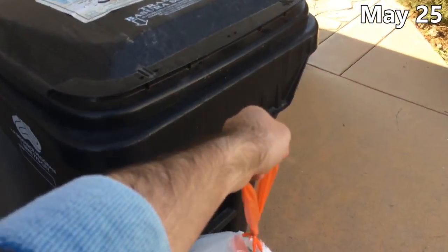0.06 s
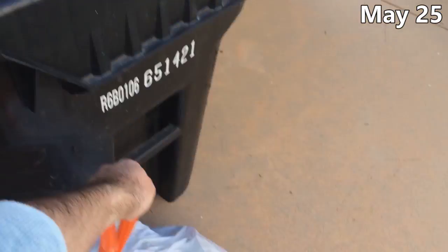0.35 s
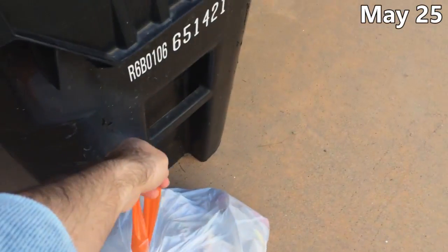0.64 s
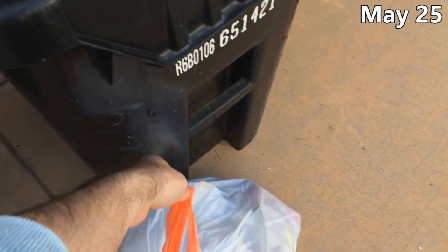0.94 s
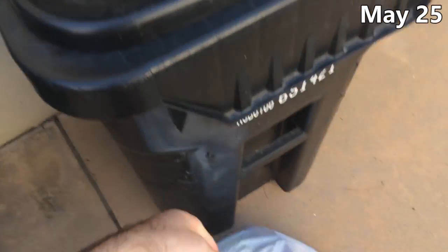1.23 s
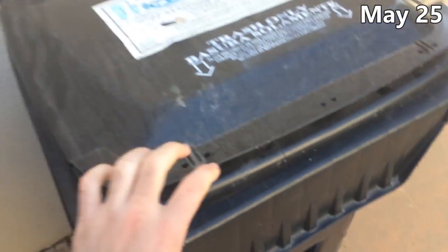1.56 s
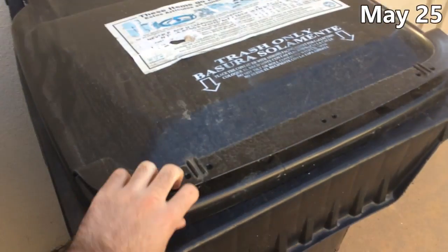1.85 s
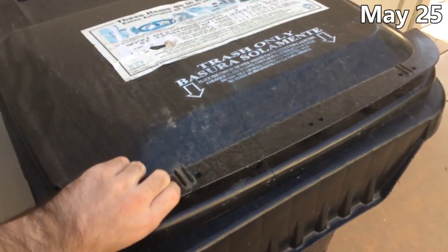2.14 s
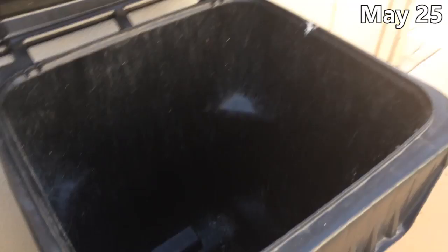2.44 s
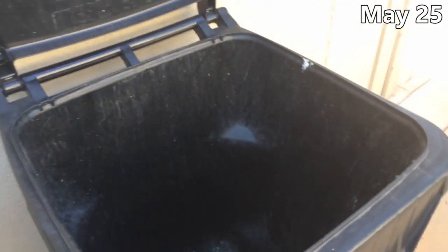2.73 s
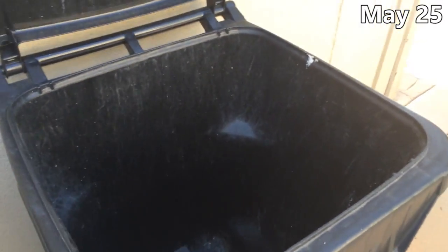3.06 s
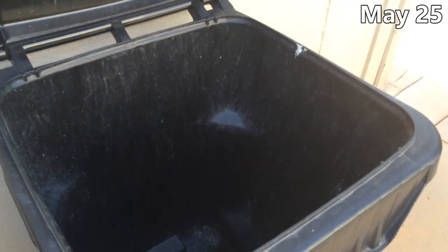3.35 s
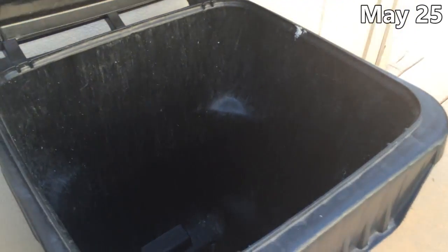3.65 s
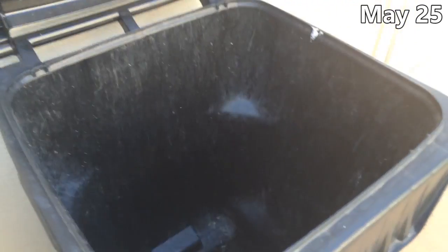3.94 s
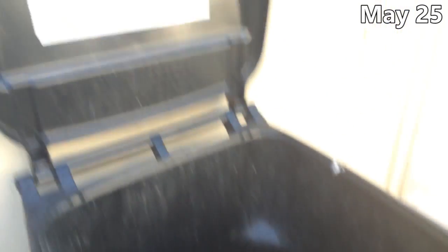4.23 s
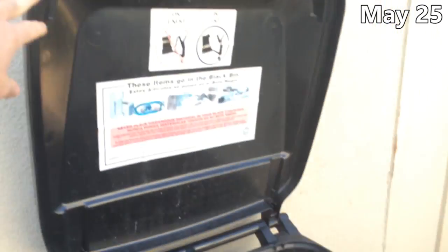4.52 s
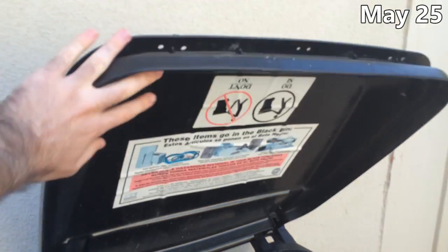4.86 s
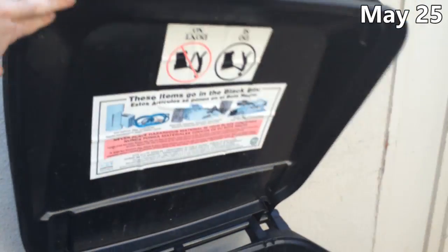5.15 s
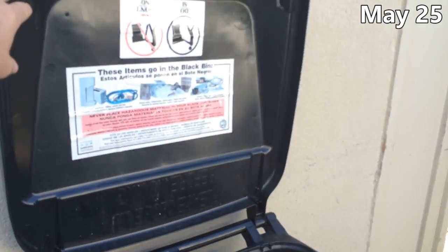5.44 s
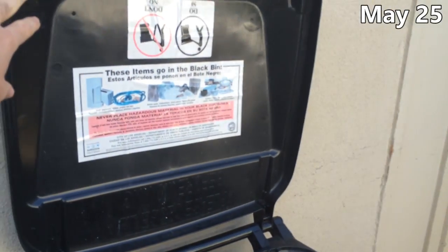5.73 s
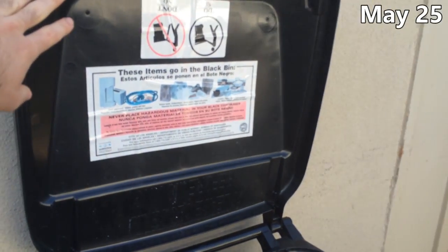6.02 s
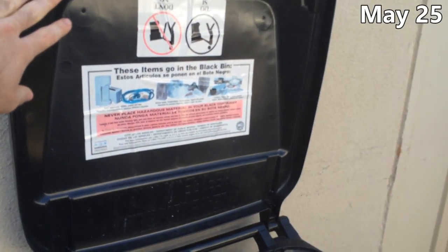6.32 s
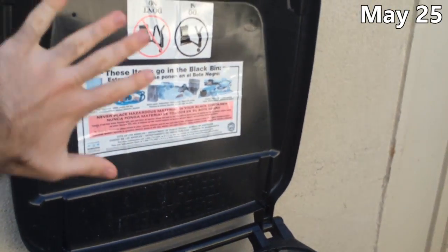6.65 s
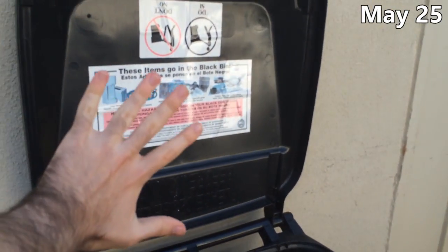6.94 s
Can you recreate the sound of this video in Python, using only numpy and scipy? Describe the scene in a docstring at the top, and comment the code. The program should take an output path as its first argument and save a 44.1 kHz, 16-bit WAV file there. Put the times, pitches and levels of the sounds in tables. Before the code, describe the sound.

A plastic trash bag crinkles, lands on concrete with a soft thud and swishes off a hand. The lid of an empty wheelie bin is then lifted, clattering on its loose hinge as the bin booms hollowly. More bursts of knocks follow as it swings back against a wall, ending with a soft bump. The sounds are close, outdoors, over a distant idling engine and low rumble.

```python
"""A rubbish bag crinkles, thuds down on concrete and slides off the hand. Then the lid of a plastic
wheelie bin is lifted, swung back on its loose hinge and knocked against a wall: each contact rings the
plastic, and the empty bin booms under it. An engine throbs at idle some way off, in the rush and rumble
of a yard. An automatic gain control ducks the loudest blows and lets the background swell back."""
import sys
import numpy as np
from scipy import signal
from scipy.fft import rfft, irfft, next_fast_len
from scipy.io import wavfile
from scipy.ndimage import uniform_filter1d, minimum_filter1d, map_coordinates

SR = 44100
rng = np.random.default_rng(int(sys.argv[2]) if len(sys.argv) > 2 else 0)


def bounce(signal):
    """Save signal as a 16-bit WAV file at the path given by the first command-line argument."""
    frames = np.transpose(np.atleast_2d(signal))
    limited = np.clip(frames, -1, 1)
    pcm = np.round(limited * 32767).astype(np.int16)
    wavfile.write(sys.argv[1], SR, pcm)


N = 312228


def amp(db):
    return 10 ** (np.asarray(db) / 20)


def unit(x):
    return x / np.sqrt(np.mean(x ** 2) + 1e-20)


def along(points, hz):
    """Read (Hz, value) points along a log frequency axis."""
    f, v = np.transpose(points)
    return np.interp(np.log(hz + 1), np.log(f + 1), v)


def curve(rows):
    """One value per sample from (seconds, value) rows."""
    return np.interp(np.arange(N) / SR, *np.transpose(rows))


def wobble(rate):
    """A smooth random curve, rate knots a second."""
    return map_coordinates(rng.standard_normal(1024), [np.arange(N) * rate / SR], mode="wrap")


def filtered(x, response):
    """Filter x by a gain given as a function of Hz."""
    m = next_fast_len(len(x) + SR // 8)
    return irfft(rfft(x, m) * response(np.fft.rfftfreq(m, 1 / SR)), m)[:len(x)]


def coloured(x, spectrum):
    """x shaped by (Hz, dB) points, at rms 1."""
    return unit(filtered(x, lambda hz: amp(along(spectrum, hz))))


def band_noise(samples, pitch_hz, q):
    """Noise around a pitch, at rms 1; a higher q narrows it."""
    band = lambda hz: 1 / np.hypot(1, q * (hz / pitch_hz - pitch_hz / (hz + 1)))
    return unit(filtered(rng.standard_normal(samples), band))


def grains(rate, spread_db):
    """Random tiny impulses, rate a second; a positive spread makes a few stand out."""
    chance, size = rng.random(N), rng.standard_normal(N)
    return unit((chance < rate / SR) * size * amp(spread_db * np.minimum(rng.exponential(size=N), 4)))


def add(track, s, sound):
    """Mix a sound into the track at s seconds."""
    part = track[round(s * SR):][:len(sound)]
    part += sound[:len(part)]


def yard():
    """Distant outdoor rush, a thin whir that comes and goes, low rumble and a drone that soon stops."""
    # Level curves. Each row: time in seconds, level in dB.
    air_levels = [(0, -43), (.6, -45.5), (1.1, -43), (1.5, -41.5), (1.9, -51), (2.8, -47.5), (4, -51.5),
                  (5.3, -50), (6, -52.5)]
    whir_levels = [(0, -63), (.6, -54.5), (1.1, -55), (2, -66.5), (3.3, -57), (4.2, -64), (7, -72)]
    rumble_levels = [(0, -46.5), (1.2, -58), (2, -48), (3.2, -46), (4.7, -45.5), (5.4, -51), (6.1, -69),
                     (6.7, -53), (7, -43.5)]
    drone_levels = [(0, -34), (.17, -44.5), (.4, -41), (.54, -33), (.61, -37), (.66, -55), (.9, -90)]
    # Noise colours. Each row: frequency in Hz, relative level in dB.
    air_colour = [(150, -7), (250, 0), (440, -1), (600, -4.5), (900, -7.5), (1330, -7.5), (1700, -10),
                  (2700, -14.5), (4000, -20), (6000, -24.5), (9000, -33), (15500, -41)]
    whir_colour = [(1100, -33), (1500, -0.5), (1700, 3.5), (1950, 0), (2300, -9.5), (3200, -47)]
    rumble_colour = [(20, -22), (40, -14), (55, 27), (80, 23), (120, 16.5), (250, 2), (500, -62.5)]
    air_swell = amp(curve(air_levels) - 1.87 + .6 * wobble(4.845))
    air = air_swell * coloured(rng.standard_normal(N), air_colour)
    whir = amp(curve(whir_levels)) * coloured(rng.standard_normal(N), whir_colour)
    gusts = amp(1.5 * wobble(6))
    rumble = amp(curve(rumble_levels)) * gusts * coloured(rng.standard_normal(N), rumble_colour)
    drone_hz = curve([(0, 92.7), (.55, 96.1)]) * (1 + 0.032 * wobble(11.3))
    drone = amp(curve(drone_levels)) * unit(np.sin(2 * np.pi * np.cumsum(drone_hz) / SR))
    return air + whir + rumble + drone


def engine():
    """An idling engine: each firing gives one exhaust throb and shakes the casing."""
    # Exhaust harmonics. Each row: multiple of the firing rate, relative level in dB.
    orders = [(1, -22), (2, -11), (3, -6), (4, -3.5), (5, -2), (6, -14), (7, -8), (8, -0.5), (9, -10),
              (10, -21), (11, -28), (12, -19.5), (13, -36), (14, -12), (15, -17), (16, -68)]
    # Narrow casing resonances. Each row: centre in Hz, width in Hz, relative level in dB.
    casing_modes = [(363, 7.2, -3), (450, 24, -8), (621, 4.1, 6.5), (929, 19, -3.5)]
    firing_hz = 25.5 * (1 + .012 * wobble(5))
    phase = 2 * np.pi * np.cumsum(firing_hz) / SR
    # the pipe delays higher orders, spreading each throb; each order wavers on its way through the yard
    exhaust = sum(amp(db + 1.5 * wobble(6)) * np.cos(round(k) * phase - .31 * k * k + .25 * wobble(8))
                  for k, db in orders)
    shaking = rng.standard_normal(N) * (1 + 0.31 * np.cos(phase))
    casing = filtered(shaking, lambda f: sum(amp(db) * 1j * f * width / (hz * hz - f * f + 1j * f * width)
                                             for hz, width, db in casing_modes))
    return amp(-45.5 + 1.53 * wobble(12)) * unit(exhaust) + amp(-58) * unit(casing)


def hand_strokes():
    """Skin hisses faintly as it slides over the lid."""
    # Each row: middle in seconds, level in dB, half length in seconds.
    strokes = [(2.43, -57.5, 0.15), (3.975, -55, 0.022), (4.92, -61.5, 0.046), (5.177, -56.5, 0.057)]
    # Colour of skin on plastic. Each row: frequency in Hz, relative level in dB.
    skin_colour = [(3000, 0), (6000, 1), (10000, -4), (15000, -0.5)]
    t = np.arange(N) / SR
    sliding = sum(amp(db) * np.exp(-.5 * ((t - s) / half_length) ** 2) for s, db, half_length in strokes)
    return sliding * coloured(grains(rate=9500, spread_db=-2), skin_colour)


def scuffs():
    """Sleeve and bag brush in short, dull swells."""
    # Each row: middle in seconds, level in dB, half length in seconds, pitch in Hz.
    rubs = [(0.231, -44, 0.011, 596), (0.978, -44, 0.01, 750), (1.057, -46.5, 0.0092, 670),
            (1.411, -43.5, .014, 900), (1.477, -39, 0.011, 1010), (1.607, -49, 0.03, 950)]
    out, t = np.zeros(N), np.arange(-SR // 8, SR // 8) / SR
    for s, db, half_length, pitch_hz in rubs:
        swell = amp(db) * np.exp(-.5 * (t / half_length) ** 2)
        add(out, s + t[0], swell * band_noise(len(t), pitch_hz, q=3))
    return out


def clicks(rows, level_db, t60, tail_db, tail_t60):
    """Tiny broad snaps, each with a longer answer from the yard."""
    out, t = np.zeros(N), np.arange(SR // 8) / SR
    for s, db, pitch_hz in rows:
        decay = amp(-60 * t / t60) + amp(tail_db - 60 * t / tail_t60)
        add(out, s, amp(db + level_db) * decay * band_noise(len(t), pitch_hz, q=.9))
    return out


def blows(rows, modes, ring_db, damping, tail_db, direct_s, snap_db, spot_db):
    """Each contact rings the bin's modes and a dense, noisy shell response in its own colour."""
    # Dense ringing of plastic and yard. Each row: frequency in Hz, gain in dB.
    shell_colour = [(25, 0), (50, 11), (85, 23), (135, 14.5), (200, 15), (380, 12.5), (550, 10.5),
                    (1050, 8.5), (1500, 11.5), (2500, 10), (3600, 6), (5000, 2), (7500, 4), (15000, -12)]
    # How long it rings. Each row: frequency in Hz, seconds to fade by 60 dB.
    shell_t60 = [(80, 0.64), (300, 0.42), (1000, 0.19), (2500, 0.12), (5000, 0.13), (14000, 0.12)]
    out, t = np.zeros(N), np.arange(SR // 2) / SR
    mode_hz, mode_db, mode_t60 = np.transpose(modes)[:, :, None]
    is_panel = mode_hz > 450
    # each mode needs about a cycle to build up
    ringing = amp(mode_db + ring_db - 60 * damping * t / mode_t60) * (1 - np.exp(-t * mode_hz))
    # the struck panel sounds first, then the cavity rings on more quietly
    envelope = amp(tail_db) + (1 - amp(tail_db)) * np.exp(-t / direct_s)
    for s, boom_db, hollow_db, clack_db, crack_db, rise, spot_hz in rows:
        contact = [(85, boom_db), (190, hollow_db), (380, hollow_db), (800, clack_db), (5000, crack_db)]
        # the struck spot lifts or dips its own band
        spot = lambda f: spot_db * np.exp(-(np.log((f + 1) / spot_hz) / 0.16) ** 2)
        colour_db = lambda f: along(contact, f) + spot(f)
        # panel modes take another strength, sign and tension at each contact
        strength, side, tension = rng.standard_normal((3, len(modes), 1))
        scatter = np.where(is_panel, np.sign(side) * amp(3.5 * strength - 2.5), amp(strength))
        drive = amp(colour_db(mode_hz)) * scatter
        tuned_hz = mode_hz * (1 + .01 * tension * (mode_hz > 200))
        ring = (drive * ringing * np.sin(2 * np.pi * tuned_hz * t)).sum(axis=0)
        hz, frame_s, noise = signal.stft(rng.standard_normal(len(t)), SR, nperseg=512)
        band_decay = amp(-60 * frame_s / along(shell_t60, hz)[:, None])
        fading = signal.istft(noise * band_decay, SR, nperseg=512)[1][:len(t)]
        shell = filtered(fading, lambda f: amp(along(shell_colour, f) + colour_db(f)))
        bass = filtered(shell, lambda f: 1 / (1 + (f / 400) ** 4))
        treble_snap = (shell - bass) * (1 + amp(snap_db - 60 * t / 0.0047))
        bass_swell = bass * (1 - np.exp(-t / 0.0036))
        attack = 1 - np.exp(-t / max(rise, 1e-4))
        add(out, s, (treble_snap + bass_swell + ring) * envelope * attack)
    return out


def bag_film():
    """The bag's thin film crinkles as it flexes and swishes as it slides off the hand."""
    # Film and drawstring slides. Each row: start in seconds, level in dB, rise and t60 in seconds.
    slides = [(0.361, -23, 0.0089, 0.29), (1.216, -25, 0.016, 0.13), (1.275, -40.5, .008, 0.17),
              (1.328, -24, 0.0031, 0.13), (1.456, -42.5, 0.013, 0.35)]
    # How hard the film is flexed until let go. Each row: time in seconds, level in dB.
    flex_levels = [(0, -61), (.12, -53.5), (.28, -56), (.45, -42), (.7, -65.5), (1, -58), (1.2, -51),
                   (1.45, -51.5), (1.8, -74)]
    # Colours of crinkle and swish. Each row: frequency in Hz, relative level in dB.
    film_colour = [(1470, -22), (2500, -16), (3030, 2), (3270, -4.5), (6540, -1), (14000, -7.5),
                   (15500, -12.5)]
    swish_colour = [(500, -47), (1000, 9.5), (1300, 11), (1800, 8.5), (2700, 7), (4000, 4), (6500, 1),
                    (10000, -57), (15000, -57)]
    # Sharp crackles. Each row: start in seconds, relative level in dB, pitch in Hz.
    snaps = [(0.0795, -19, 7140), (0.1795, -24.5, 4280), (0.613, -24, 9870), (0.711, -21, 7600),
             (1.0418, -28, 6440), (1.281, -22, 4440), (1.6253, -26, 6010), (1.6527, -25, 4900),
             (1.749, -32, 4580), (1.891, -28.5, 3900)]
    t, slide = np.arange(SR // 2) / SR, np.zeros(N)
    for s, db, rise, t60 in slides:
        add(slide, s, amp(db - 60 * t / t60) * (1 - np.exp(-t / rise)))
    since_let_go = np.maximum(np.arange(N) / SR - flex_levels[-1][0], 0)
    flexing = amp(curve(flex_levels) - 58 * since_let_go + 0.9 * wobble(38.75))  # settles 58 dB a second
    crumpling = flexing + amp(-7.5) * slide  # each slide also crumples the film
    crinkle = crumpling * coloured(grains(rate=2600, spread_db=1.2), film_colour)
    crease_pops = amp(-4.5) * flexing * coloured(grains(rate=27, spread_db=5.0), film_colour)
    swish = slide * coloured(grains(rate=8000, spread_db=-1.5), swish_colour)
    crackles = clicks(snaps, level_db=-13.5, t60=0.013, tail_db=-19.5, tail_t60=0.19)
    return crinkle + crease_pops + swish + crackles


def bag_landing():
    """The bag lands on concrete beside the bin in quick thuds with a low, hollow ring."""
    # Each row: start in seconds, boom, hollow, clack and crack in dB, rise in seconds, struck spot in Hz.
    thuds = [(0.346, -36, -18, -16.5, -30.5, 0.0032, 1870), (0.37, -45, -12, -21, -49.5, 0.0054, 1680.0),
             (0.402, -19, -21.5, -25, -33, 0.003, 2100.0), (0.465, -21, -30, -26.5, -31.5, 0.01, 1530.0)]
    # Low resonances of the bin as the bag touches it.
    # Each row: pitch in Hz, relative level in dB, t60 in seconds before damping.
    low_bin_modes = [(138, -8, 0.32), (193.8, -9.5, 1), (314, -30, 0.18)]
    return blows(thuds, low_bin_modes, ring_db=2.0, damping=0.35, tail_db=-15.5, direct_s=0.03,
                 snap_db=-17, spot_db=-2)


def rebounds(knocks):
    """The loose lid chatters: each knock becomes a first contact and its ever softer rebounds."""
    gap_s, loss_db, softening = .0135, 0.9, 0.073  # per rebound
    soft_rise_s, hard_rise_s = 0.0064, 0.00066  # a harder contact is shorter
    soft_crack_db, hard_crack_db = -37, -8.5  # and so brighter
    rows = []
    for s, db, hardness, hollow_db, boom_db, count, spot_hz in knocks:
        gaps = gap_s * np.exp(.15 * rng.standard_normal(size=6))
        for gap in gaps[:round(count) + 1]:
            hardness = np.clip(hardness, 0, 1)
            rise = soft_rise_s * (hard_rise_s / soft_rise_s) ** hardness
            crack_db = soft_crack_db + (hard_crack_db - soft_crack_db) * hardness
            rows.append((s, db + boom_db, db + hollow_db, db, db + crack_db, rise, spot_hz))
            s, db, hardness = s + gap, db - loss_db, hardness - softening
    return rows


def bin_lid():
    """The lid knocks on rim, hinge and wall, and the empty bin booms under it."""
    # Each row: start in seconds, strength in dB, hardness from 0 to 1, hollow and boom in dB over
    # the strength, number of rebounds, resonance of the struck spot in Hz.
    knocks = [(2.111, -41.5, 0.54, -2, 11, 0, 1330), (2.359, -27.5, 0.35, 0, 6, 1, 970),
              (2.412, -38, 0.5, 8, 22.5, 0, 880), (2.472, -20, 0.37, -1.5, -14, 0, 1260),
              (2.497, -17.5, 0.32, -1.5, -1, 0, 1360), (2.548, -20.5, 0, -0.5, 1, 0, 520),
              (2.609, -19, 0.66, 4.5, 4, 1, 1690), (2.651, -12.5, 0.95, -2, -5, 2, 1080),
              (2.69, -12.5, 0.96, -1, -16, 2, 1230), (2.729, -7, 0.9, -1, 1.5, 2, 900),
              (2.772, -11, 0.73, -1.5, -4, 0, 1840), (2.793, -13.5, 0.89, 2, 5.5, 0, 1920),
              (2.864, -19.5, 0.55, -1, -8, 0, 1290), (3.531, -34, .2, 15, 2, 0, 820),
              (3.544, -16.5, 0.2, -10.5, -17, 0, 2010), (3.569, -10, .68, -7, -15, 1, 780),
              (3.68, -30, 0, 0, 5, 0, 540), (3.724, -30, 0.81, -3.5, -20, 0, 905),
              (3.799, -21, .62, -4.5, -24, 0, 950), (3.932, -39, 0.6, 11.5, -5, 0, 920),
              (3.953, -21, 0.12, -8, 0, 0, 980), (4.016, -24.5, 0.32, -0.5, 1, 0, 870),
              (4.087, -30, 0.5, 7, 5.5, 0, 510), (4.229, -17, 0.84, 7.5, -5, 0, 930),
              (4.241, -8, 0.81, -2, -13, 1, 890), (4.3, -13, 0.67, -1.5, -3, 2, 990),
              (4.367, -17.5, 0.46, -13, -1, 0, 1750), (4.958, -14, .88, -11.5, -16, 0, 2100),
              (4.966, -13.5, 0.4, -4, -12, 0, 1110), (5.072, -42, 1, 13, 14, 0, 580),
              (5.115, -30.5, 0, 2, 6, 0, 1280), (5.208, -40.5, .55, 6, 15, 0, 880),
              (5.312, -16, 0.38, -6.5, -31, 0, 1160), (5.404, -40, 0.5, 12.5, 13, 1, 526),
              (5.574, -15, 0.88, 4.5, -7, 0, 830), (5.591, -12, 0.81, -3.5, -14, 1, 2700),
              (5.633, -18.5, 0.3, 1.5, -21, 0, 730), (5.75, -51.5, 0.3, -2, 28.5, 0, 690),
              (6.815, -33.5, 0.36, 0, 9.5, 1, 750)]
    # Bin and lid resonances. Each row: pitch in Hz, relative level in dB, t60 in seconds before damping.
    bin_modes = [(81, -3, 0.47), (135, -14, 0.45), (184, -12, 0.44), (213, -10, 0.44), (275, -9, 0.43),
                 (331, -8, 0.42), (394, -13, 0.41), (423, -12, 0.41), (517, -18, 0.4), (611, -16, 0.39),
                 (684, -13, 0.38), (773, -15, 0.37), (907, -13, 0.35), (977, -12, 0.35), (1044, -13, 0.34),
                 (1098, -15, 0.34), (1152, -15, 0.33), (1246, -13, 0.32), (1347, -19, 0.32),
                 (1394, -15, 0.31), (1645, -17, 0.3), (1871, -13, 0.29), (2054, -15, 0.28),
                 (2153, -15, 0.27), (2326, -13, 0.26), (2436, -16, 0.26), (2514, -16, 0.26),
                 (2735, -15, 0.25), (2923, -18, 0.24)]
    # Light ticks of fingers and hinge. Each row: start in seconds, relative level in dB, pitch in Hz.
    ticks = [(2.113, -49, 2520), (2.347, -32, 3460), (2.592, -39, 2580), (2.993, -44.5, 2560),
             (4.368, -47, 2920), (5.331, -43, 6000), (5.8656, -49, 3050)]
    clatter = blows(rebounds(knocks), bin_modes, ring_db=3.5, damping=1.71, tail_db=-8, direct_s=0.031,
                    snap_db=8.5, spot_db=6)
    return clatter + clicks(ticks, level_db=-8, t60=0.023, tail_db=-1.5, tail_t60=.1)


def scene():
    """The bag, the lid and the yard around them, in mono."""
    return (bag_film() + bag_landing() + hand_strokes() + scuffs() + bin_lid() + engine() + yard())[None]


def gain_control(x, limit_db, hold_s, release_db_per_s):
    """The gain drops just after a loud blow begins, holds, then climbs back."""
    trailing = lambda v, size: uniform_filter1d(v, size=size, origin=(size - 1) // 2)
    level_db = 10 * np.log10(np.abs(trailing(x ** 2, size=255)) + 1e-12)
    span = 2 * int(hold_s * SR / 2) + 1
    held_cut_db = -minimum_filter1d(np.minimum(limit_db - level_db, 0), span, origin=span // 2)
    ramp = release_db_per_s * np.arange(N) / SR
    cut_db = np.maximum.accumulate(held_cut_db + ramp) - ramp
    return x * amp(-trailing(cut_db, size=41))


def record(dry):
    """Duck the loudest blows, round off the peaks and cut the highest treble."""
    ducked = gain_control(dry[0], limit_db=-11.5, hold_s=0.3, release_db_per_s=83)
    rounded = ducked / (1 + np.abs(ducked / .7) ** 6) ** (1 / 6)
    return filtered(rounded, lambda hz: hz < 15750)[None]


dry = scene()
out = record(dry)
bounce(out)
```